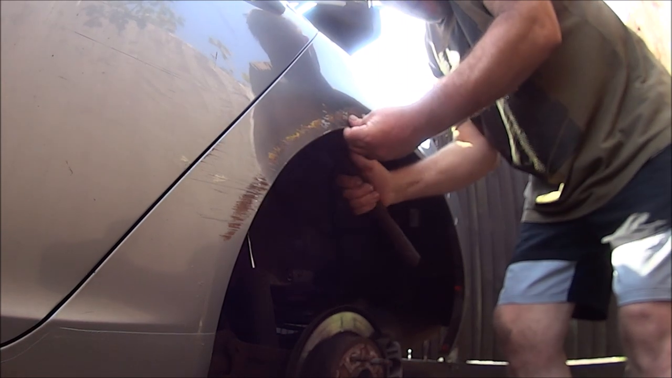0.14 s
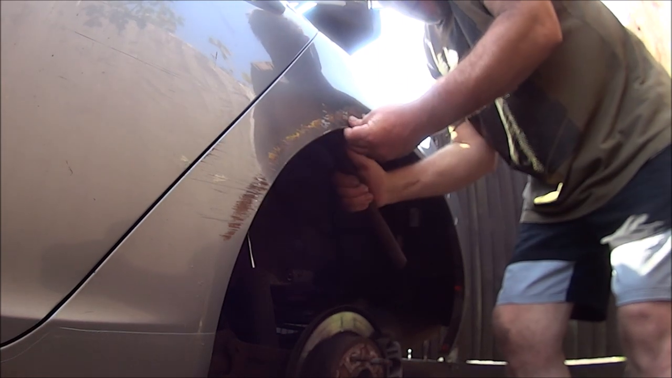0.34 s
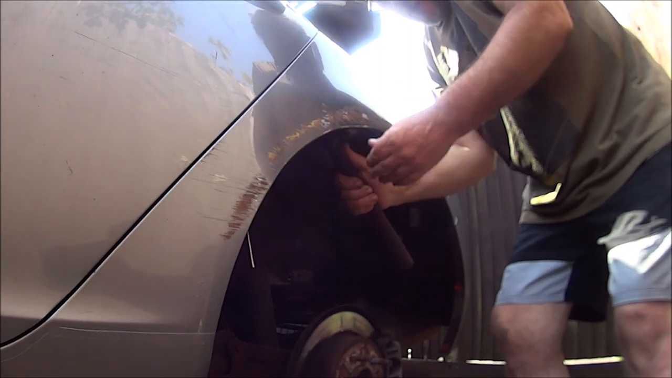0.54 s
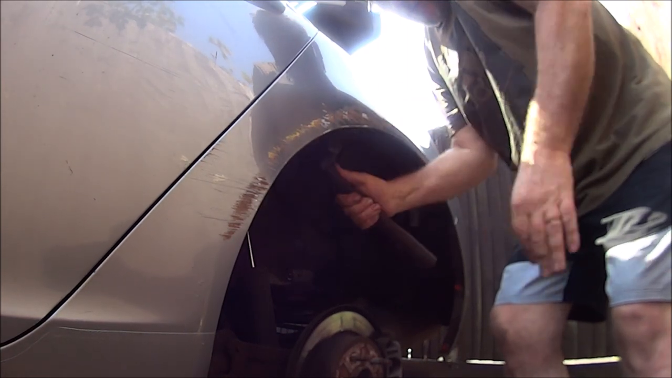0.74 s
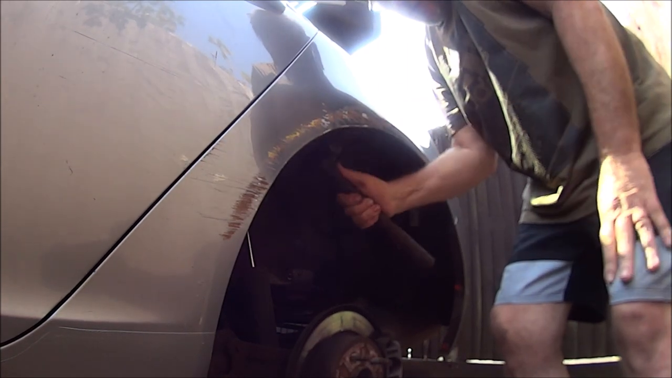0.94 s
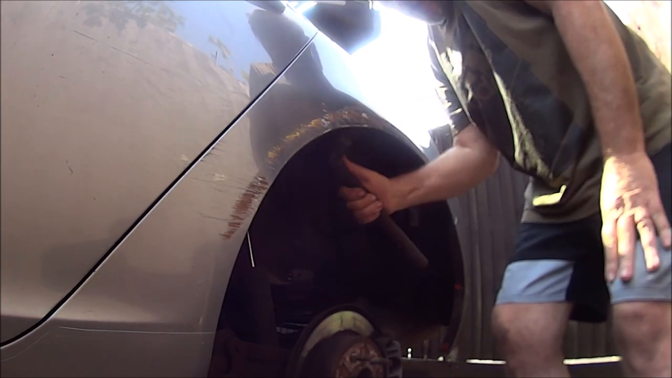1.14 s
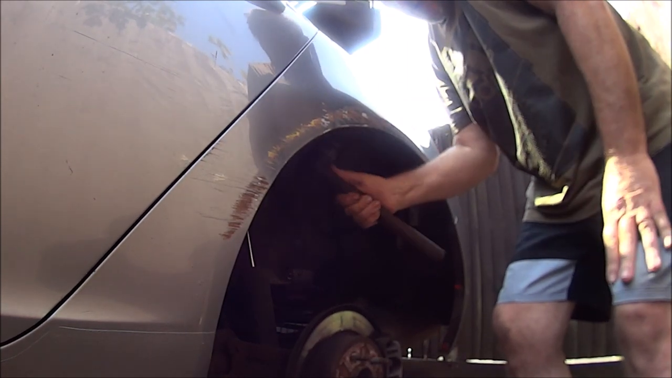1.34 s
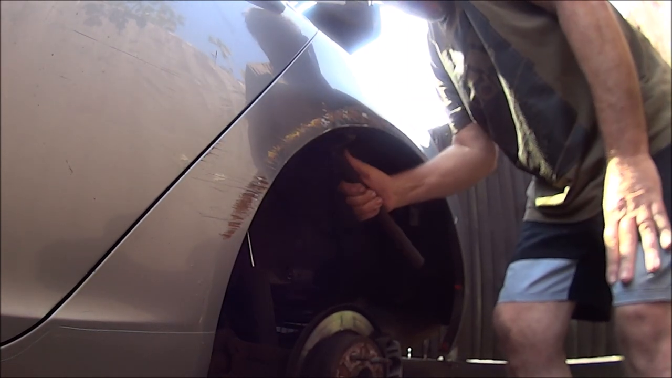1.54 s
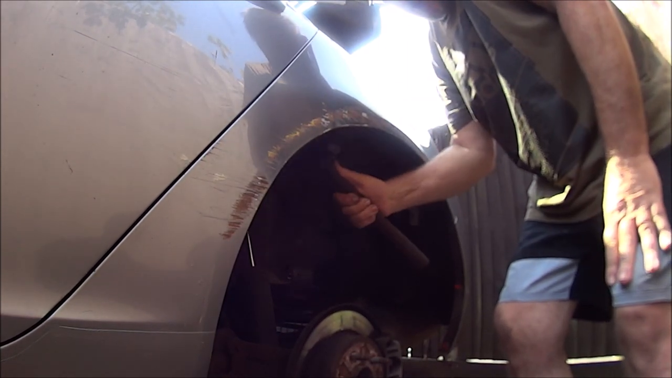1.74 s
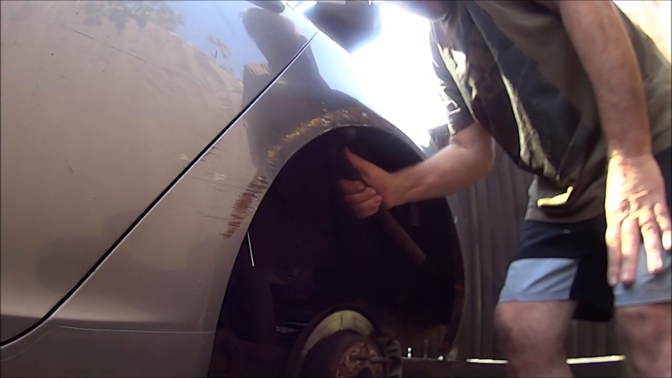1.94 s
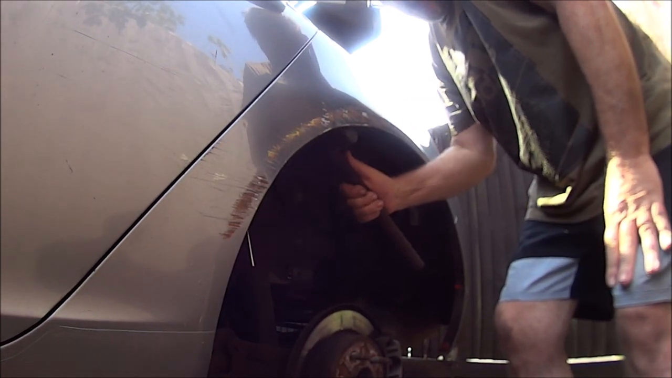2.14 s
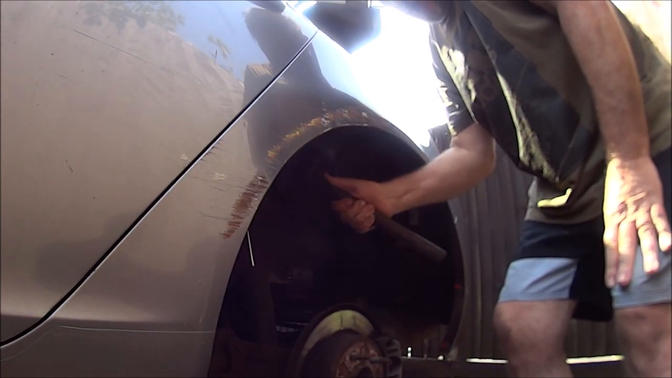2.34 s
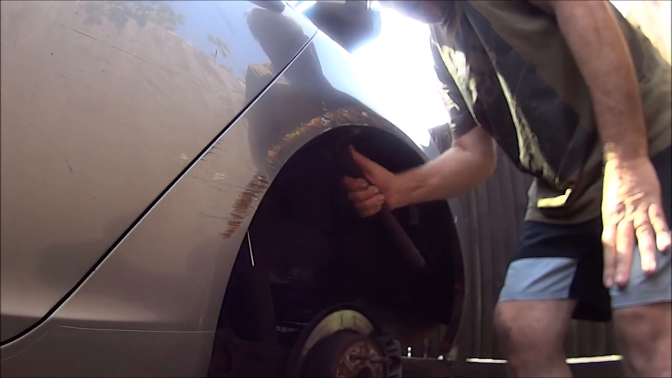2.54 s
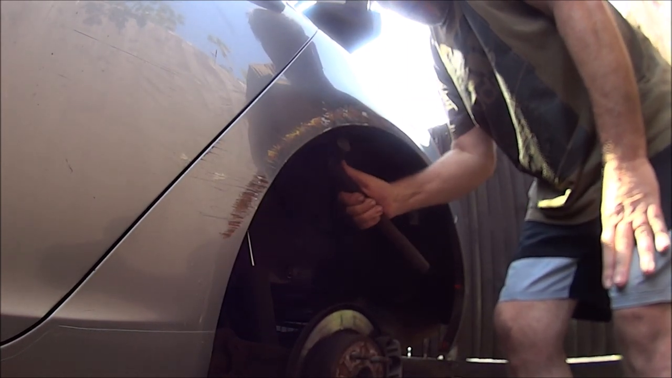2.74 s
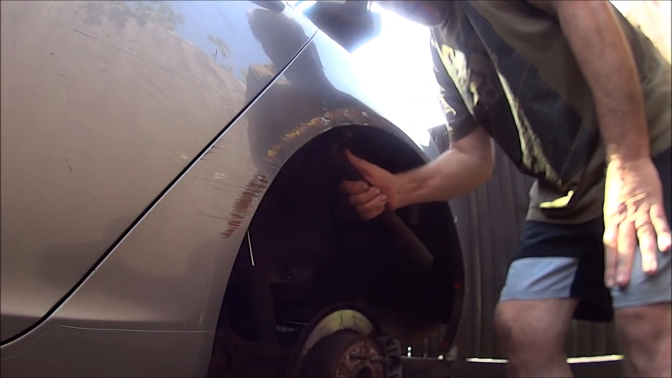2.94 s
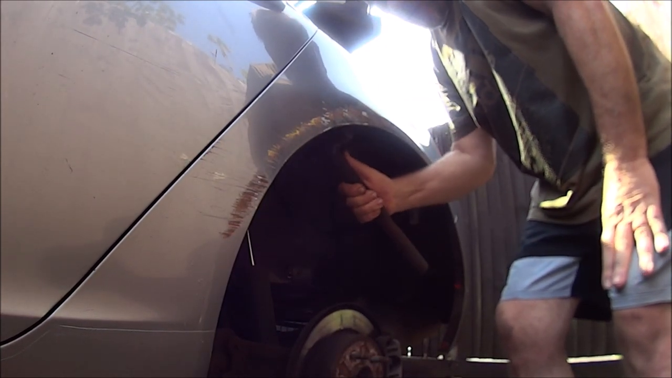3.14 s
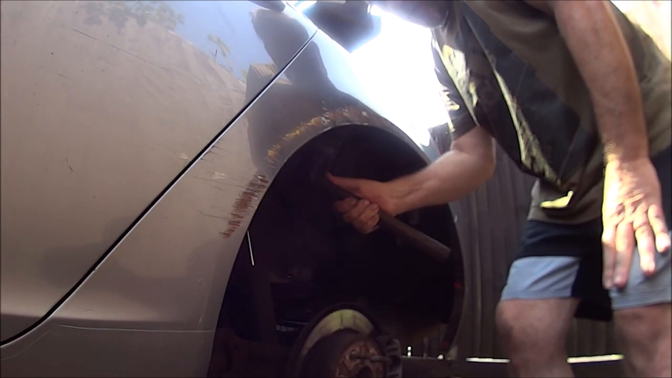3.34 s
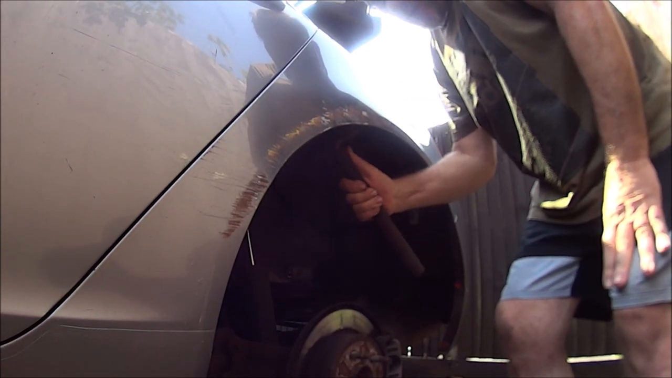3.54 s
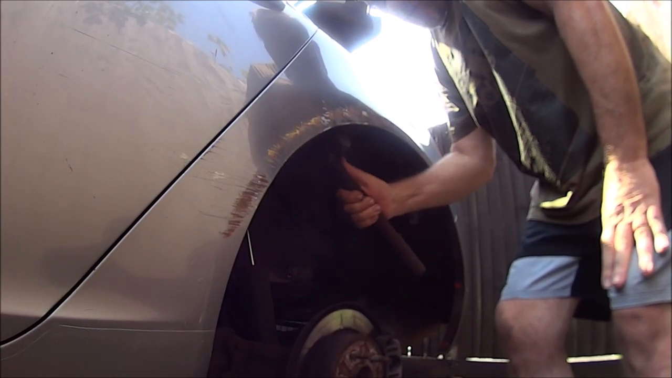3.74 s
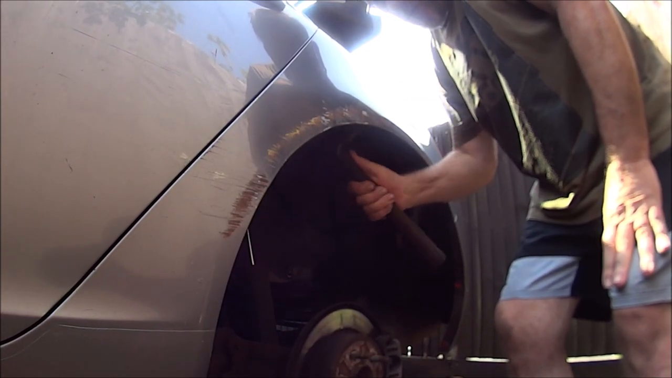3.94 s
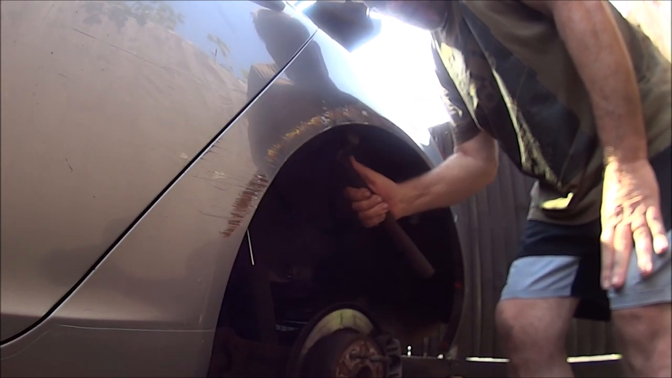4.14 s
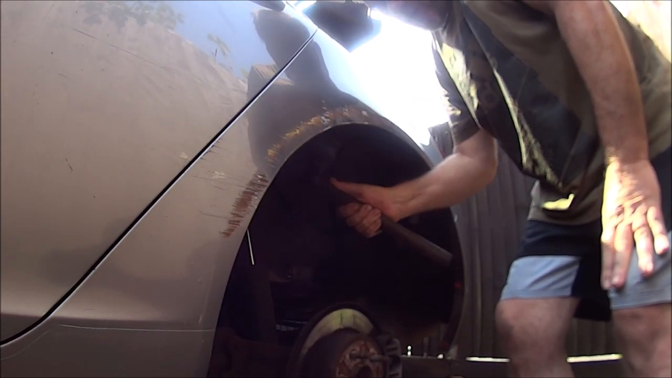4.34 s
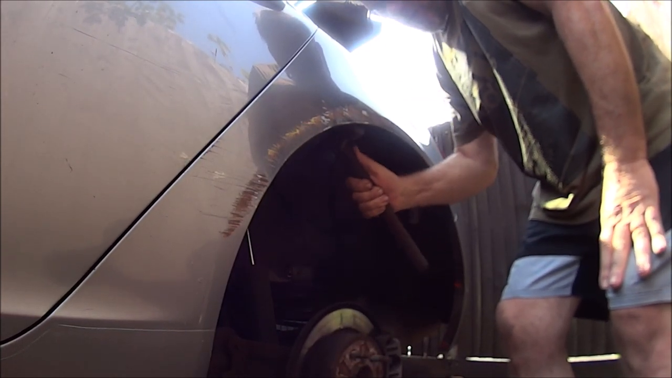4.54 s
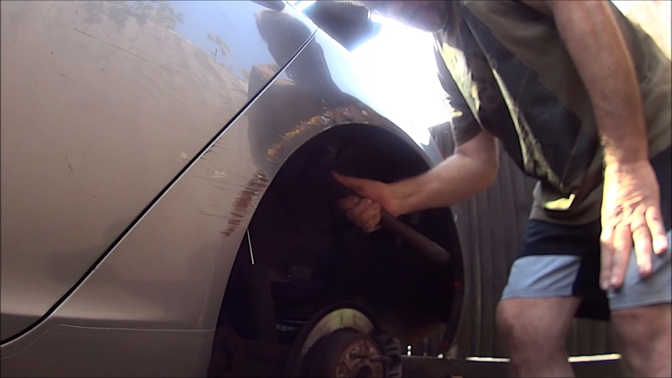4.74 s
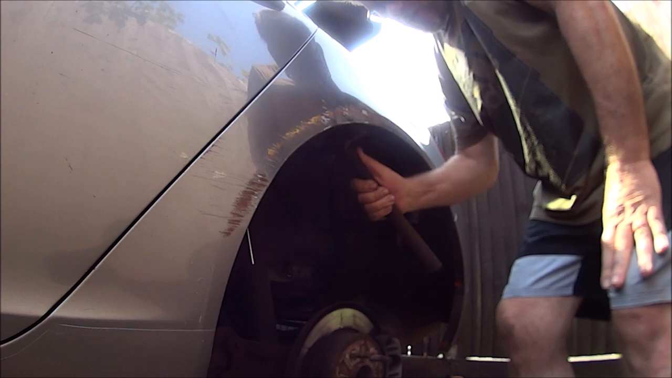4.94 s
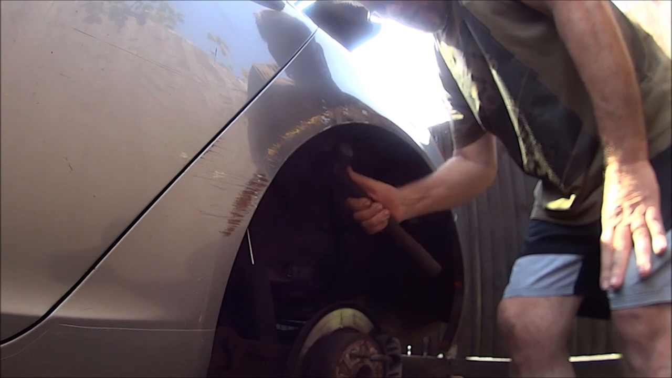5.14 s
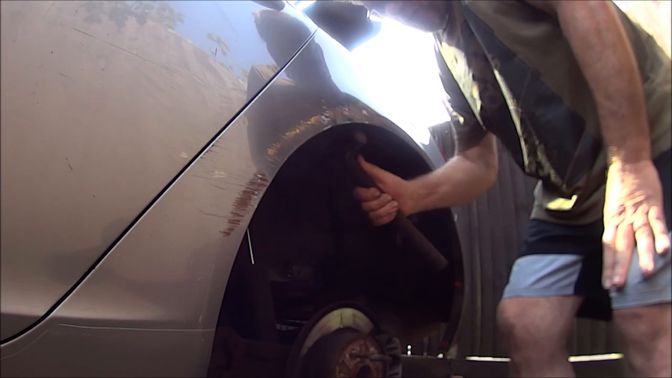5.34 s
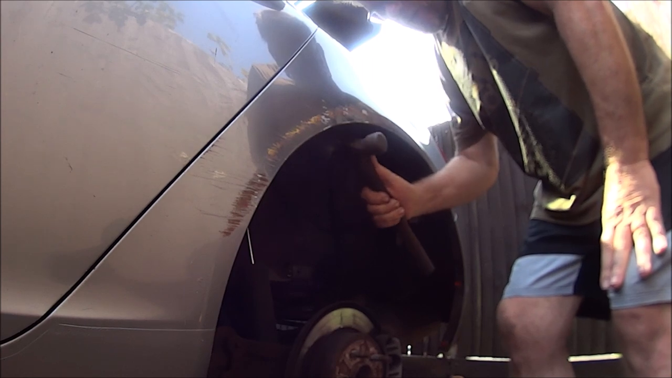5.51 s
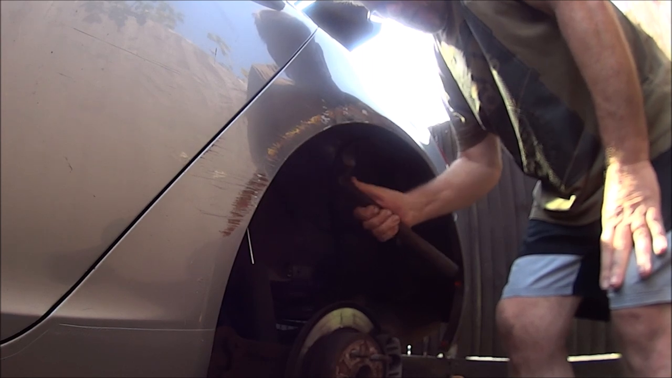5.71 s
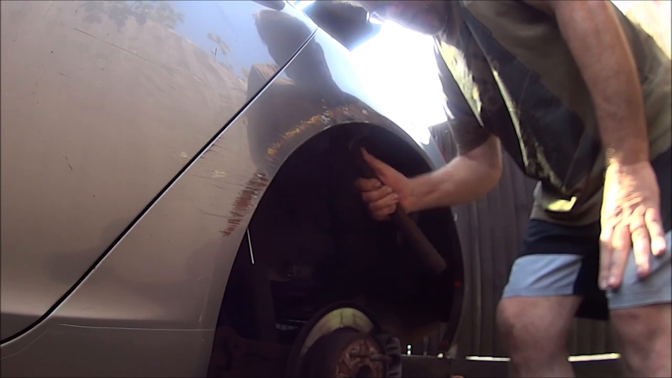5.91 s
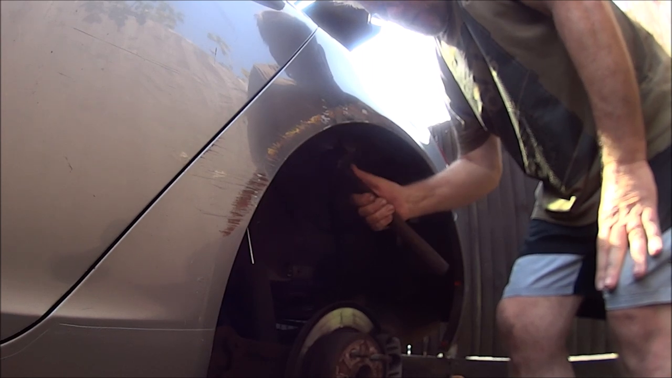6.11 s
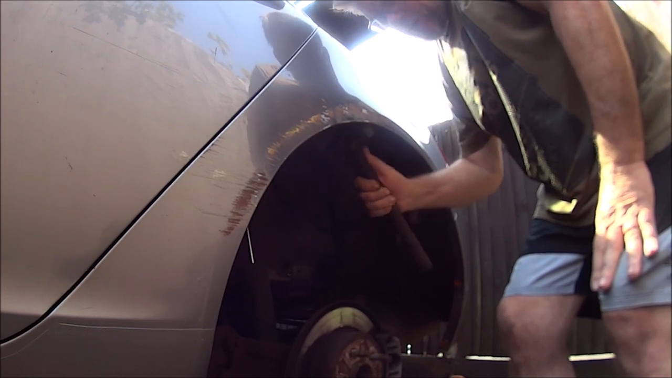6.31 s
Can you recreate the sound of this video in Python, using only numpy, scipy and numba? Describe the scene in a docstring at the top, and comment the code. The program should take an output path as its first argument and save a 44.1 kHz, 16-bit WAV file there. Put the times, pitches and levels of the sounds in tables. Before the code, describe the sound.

A hammer head scrapes and taps lightly on steel inside a car's wheel arch over faint hum and rumble. After about a second, hard regular blows begin, roughly two per second, each a sharp crack with a hollow thud, short metallic ring and rattling tail, many followed by a weaker bounce. Close, in a garage, on a small hissy camera microphone that squashes the hits. At the very end the hammering races, bright and high-pitched.

```python
"""In a garage, a hammer knocks a steel wheel arch from inside about twice a second, often bouncing once.
Each contact pushes the panel, which thuds, rings in modes and rattles in a noisy tail, under a noise-burst crack.
First the head shuffles (random slips through the panel) and knocks; hum partials and filtered rumble sink
as the blows start. A small camera microphone limits, clips and hisses.
For the last third of a second time runs four times fast, so two blows turn into bright double cracks."""
import sys
import numpy as np
from scipy import signal
from scipy.fft import rfft, irfft, next_fast_len
from scipy.io import wavfile
from scipy.ndimage import uniform_filter1d
from numba import njit

SR = 44100
rng = np.random.default_rng(int(sys.argv[2]) if len(sys.argv) > 2 else 0)


def int16_out(signal):
    """Quantize to a 16-bit WAV file."""
    q = np.round(np.clip(np.atleast_2d(signal).T, -1, 1) * 32767)
    wavfile.write(sys.argv[1], SR, q.astype(np.int16))


def field_ratio(decibels):
    """Amplitude ratio for a level in dB (20 dB per decade); scalars and array-likes work."""
    return 10 ** (np.asarray(decibels, dtype=float) / 20)


N = 285320

# microphone hiss spectrum: (frequency [Hz], relative density [dB])
HISS = [(20, -14), (40, 11), (70, -6), (120, -18), (1500, -2), (5000, -2), (11000, -9)]
# hiss heard in opposite phase left and right: (frequency [Hz], relative density [dB])
SIDE_HISS = [(18, -41), (30, -8), (422, -15.5), (527, -17), (842, -16), (11000, -18.5), (14300, -55),
             (22000, -120)]
# low garage rumble spectrum: (frequency [Hz], relative density [dB])
RUMBLE = [(60, -31), (100, -4), (300, 0), (600, 4), (900, -2), (1500, -5.5), (3000, -18), (6000, -36)]
# mains hum partials: (frequency [Hz], relative level [dB])
HUM = [(100.5, -51), (200, -54.5), (301.5, -52.5), (402, -55), (501, -72), (603, -79), (703, -58),
       (781, -61)]
# ringing modes of the arch, the longest belonging to the body shell:
# (frequency [Hz], relative level [dB], 60 dB decay time [s])
PANEL = [(108, -18, .33), (188, -12, .2), (300, -8, .15), (350, -5, .18), (522, -4, .16), (630, -2, .12),
         (715, 0, .13), (793, -12, .25), (845, -14, .4), (894, -10, .22), (968, -14, .25), (1092, -16, .2),
         (1185, -10, .16), (1290, -18, .18), (1420, -20, .2), (1577, -20, .2), (1715, -14, .12),
         (1812, -16, .18), (2100, -24, .13), (366, -56, 2.5), (490, -52, 2.0), (819, -44, 2.2),
         (841, -45, 1.8), (975, -51, 3.3)]
# dense upper modes and the garage, as a noisy tail: (frequency [Hz], relative density [dB])
TAIL = [(60, -38), (110, 2), (300, 1), (550, 2.5), (800, -1.5), (1270, -0.5), (1900, -8.5), (3000, -12),
        (5500, -10), (11000, -50)]
# how long that tail rings: (frequency [Hz], 60 dB decay time before ring scaling [s])
TAIL_T60 = [(80, 0.39), (210, 0.26), (560, 0.34), (1500, 0.2), (4000, 0.26), (10000, 0.042)]
# the hammer head drags and shuffles on the steel: (time [s], length [s], relative level [dB])
SCRAPES = [(0.0, 0.022, -35), (0.048, 0.69, -42.5), (0.145, 0.048, -27), (0.191, 0.054, -18),
           (0.321, 0.03, -47), (0.384, 0.017, -38), (0.467, 0.031, -23), (0.491, 0.053, -24.5),
           (0.609, 0.035, -22), (1.043, 0.12, -43)]
# the head is set against the arch: (heard time [s], strength [dB], crack against strength [dB])
KNOCKS = [(.184, -5.5, -21), (.228, -21, -41)]
# the head rebounds and lands again: (heard time [s], strength [dB], crack against strength [dB])
BOUNCES = [(1.749, -19.5, -44), (2.781, -13, -35), (3.252, -9, -8), (3.818, -18, -53), (4.244, -10, -26.5),
           (4.707, -8.5, -24), (5.192, -10, -50), (6.2651, -7.5, -8), (6.3907, -9, -13)]
# full swings: (heard time [s], strength [dB], crack against strength [dB])
BLOWS = [(1.221, -10, -2.5), (1.695, -7.5, -9), (2.172, -7, -16.5), (2.665, -7.5, -3.5), (3.151, -8.5, -2),
         (3.653, -8, -3), (4.143, -8.5, -2), (4.616, -6, -5), (5.100, -6, -4), (5.577, -6.5, -2.5),
         (6.074, -7.5, -10.5), (6.2433, -6.5, -3.5), (6.3668, -6.5, 5)]

# (ring length factor, time until the head settles on the steel [ms], starting thud [Hz], boom offset [dB])
BLOW_CONTACT, BOUNCE_CONTACT, KNOCK_CONTACT = (0.97, 83, 682, 0.11), (0.72, 42, 659, 0.058), (0.61, 48, 453, 5.4)
# the background sinks at the first blow, then creeps: (before [dB], after [dB], creep [dB/s])
HUM_DB, RUMBLE_DB, MIC_HISS_DB = (-50, -80, 2.5), (-46, -56.5, 0.36), (-50.5, -54, -0.01)
SINK_S = 0.029
SIDE_HISS_DB = -67.5
FAST_FROM_S, FADE_S, FAST = 6.158, 0.012, 4  # FAST is a speed factor
TOP_HZ, FAST_TOP_HZ = 11000, 15900  # top cuts as heard
LONG = N + FAST * SR // 2  # samples of garage time, enough for the fast stretch
SCRAPE_DECAY_DB, SCRAPE_DECAY_S = 9.5, 0.15  # low noise dying away from a scrape at the start
RUMBLE_WAVER_DB, HUM_WAVER_DB = 4, 1.6  # scale of the smoothed random level
MODES_DB, TAIL_DB, SETTLE_DB = -11, -2.5, -3
MODE_SCATTER_DB, MODE_DETUNE = 3, 0.00467  # random spread of each contact; detune is a share of the pitch
BOOM_UNDER_HZ, SHELL_SPLIT_HZ, SHELL_T60_S = 400, 900, 1  # rings longer than SHELL_T60_S are shell
CLATTER_DB, CLATTER_MS = 2, 4
SLIPS_PER_S, SLIP_SPREAD_DB = 1500, 2.2
SCRAPE_RISE, RASP_DB = 0.35, -1.5  # rise is a share of the length
PANEL_GAIN_DB, CRACK_GAIN_DB = 10.5, 3.5  # how well the panel and the bare steel radiate
# as the dent flattens the thud sinks and more panel booms
THUD_SAG_HZ_PER_S, BOOM_DB_PER_S, EVEN_BOOM_S = 18.7, 2, 4.5
# contacts weaker than FULL_THUD_DB barely dent the spot, so their thud shrinks
THUD_PER_DB, FULL_THUD_DB = 1.1, -10


def norm(x):
    """Scale to rms 1."""
    return x / np.sqrt(np.mean(x ** 2))


def colour(x, table):
    """Filter by (frequency [Hz], gain [dB]) points joined on a log axis."""
    size = next_fast_len(len(x))
    hz, db = np.transpose(table)
    f = np.maximum(np.arange(size // 2 + 1) * SR / size, 1)
    gain = field_ratio(np.interp(np.log(f), np.log(hz), db))
    return irfft(rfft(x, size) * gain, size)[:len(x)]


def band(x, lo_hz, hi_hz):
    """Causal band-pass."""
    return signal.sosfilt(signal.butter(2, [lo_hz, hi_hz], "bandpass", fs=SR, output="sos"), x)


def lowpass(x, hz):
    """Steep top cut without delay."""
    return signal.sosfiltfilt(signal.ellip(8, .1, 50, hz, fs=SR, output="sos"), x)


def walk(rate):
    """Random levels held for 1 / rate seconds and smoothed twice."""
    hold = int(SR / rate)
    steps = np.repeat(rng.standard_normal(LONG // hold + 1), hold)
    return uniform_filter1d(uniform_filter1d(steps, hold), hold)[:LONG]


def true_time(s):
    """Heard time to garage time."""
    return s + (FAST - 1) * max(s - FAST_FROM_S, 0)


def sinking_level(before, after, creep):
    """Background level in dB: steady, sinking at the first blow, then creeping."""
    since = np.maximum(np.arange(LONG) / SR - BLOWS[0][0], 0)
    return before + (after - before) * np.minimum(since / SINK_S, 1) + creep * since


def mic_hiss():
    """Microphone self-noise: coloured random noise."""
    return field_ratio(sinking_level(*MIC_HISS_DB)) * norm(colour(rng.standard_normal(LONG), HISS))


def side_hiss():
    """Quiet coloured noise for the difference between the two channels."""
    return field_ratio(SIDE_HISS_DB) * norm(lowpass(colour(rng.standard_normal(N), SIDE_HISS), TOP_HZ))


def rumble():
    """Low garage rumble: coloured noise with a wavering level, plus low noise dying away from a scrape at the
    start."""
    t = np.arange(LONG) / SR
    level_db = sinking_level(*RUMBLE_DB) + SCRAPE_DECAY_DB * np.exp(-t / SCRAPE_DECAY_S)
    noise = norm(colour(rng.standard_normal(LONG), RUMBLE))
    return field_ratio(level_db + RUMBLE_WAVER_DB * walk(5.8)) * noise


def mains_hum():
    """Mains hum: steady sine partials, each wavering in level on its own."""
    t = np.arange(LONG) / SR
    hum = np.zeros(LONG)
    for k, (hz, db) in enumerate(HUM):
        hum += field_ratio(db + HUM_WAVER_DB * walk(18.0)) * np.sin(2 * np.pi * hz * t + k)
    return field_ratio(sinking_level(*HUM_DB)) * hum / field_ratio(HUM[0][1])  # levelled by the first partial


def panel_modes(ring, bass_db):
    """Decaying sine modes with new weights at each contact: the panel's sum, then the body shell's."""
    t = np.arange(SR) / SR
    hz, db, t60 = (column[:, None] for column in np.transpose(PANEL))
    chance = rng.standard_normal((len(PANEL), 2))
    hz = hz * (1 + MODE_DETUNE * chance[:, :1])
    # more boom also weakens the shell's highest long ring
    boom = np.where(t60 > SHELL_T60_S, -1. * (hz > SHELL_SPLIT_HZ), hz < BOOM_UNDER_HZ)
    level_db = MODES_DB + db + bass_db * boom + MODE_SCATTER_DB * chance[:, 1:]
    modes = field_ratio(level_db - 60 * t / (t60 * ring)) * np.sin(2 * np.pi * hz * t)
    shell = t60[:, 0] > SHELL_T60_S
    return modes[~shell].sum(axis=0), modes[shell].sum(axis=0)


def panel_tail(ring, bright_db, bass_db):
    """Dense upper modes and the garage as bands of noise, each with its own decay."""
    t = np.arange(SR // 2) / SR
    centres = 80 * 2 ** np.arange(0, 7.5, .75)
    gains, decays = (np.interp(np.log(centres), np.log(np.array(table)[:, 0]), np.array(table)[:, 1])
                     for table in (TAIL, TAIL_T60))
    # sharper contacts shake up more treble rattle
    gains = gains + bright_db * np.clip(np.log2(centres / 1000.0) / 2, 0, 1)
    gains = gains + bass_db * (centres < BOOM_UNDER_HZ)
    tail = np.zeros(len(t))
    for hz, db, t60 in zip(centres, gains, decays):
        noise = band(rng.standard_normal(len(t)), hz / 1.3, hz * 1.3)
        tail += noise * field_ratio(db - 60 * t / (t60 * ring))
    # loose seams make the tail clatter in short knots
    knot = int(CLATTER_MS * SR / 1000)
    knots = np.repeat(rng.standard_normal(len(t) // knot + 1), knot)
    tail = tail * field_ratio(CLATTER_DB * uniform_filter1d(knots, knot // 2)[:len(t)])
    return field_ratio(TAIL_DB) * tail * (1 - np.exp(-t / 0.00033))


def dent_thud(thud_hz, thud_db):
    """The struck spot: a couple of cycles of a low, heavily damped thud and its overtone."""
    t = np.arange(SR) / SR
    thud = field_ratio(3.5 + thud_db) * np.sin(2 * np.pi * thud_hz * t) * np.exp(-(t / 0.0021) ** 2)
    overtone = np.sin(2 * np.pi * 2.735 * thud_hz * t) * np.exp(-t / 0.0069)
    return thud + field_ratio(-14 + thud_db) * overtone


def panel(ring, thud_hz, settle_ms, bright_db, bass_db, thud_db):
    """One panel response: thud, modes and tail, damped as the head settles on the steel."""
    t = np.arange(SR) / SR
    modes, shell = panel_modes(ring, bass_db)
    # the bending waves take a moment to spread
    near = dent_thud(thud_hz, thud_db) + modes * (1 - np.exp(-t / 0.0026))
    near[:SR // 2] += panel_tail(ring, bright_db, bass_db)
    settled = np.clip((t - settle_ms / 1000) / 0.011, 0, 1)
    return near * field_ratio(SETTLE_DB * settled) + shell  # the shell is out of the hammer's reach


def scrapes():
    """Uneven slips that swell and fade, ringing the hand-damped panel and a raspy lip."""
    swell = np.zeros(LONG)
    for s, length, db in SCRAPES:
        u = np.linspace(0, 1, int(length * SR))
        i = int(s * SR)
        swell[i:i + len(u)] += field_ratio(db) * np.minimum(u / SCRAPE_RISE, 1) * np.sqrt(1 - u)
    sizes = field_ratio(SLIP_SPREAD_DB * rng.exponential(size=LONG)) * np.sign(rng.standard_normal(LONG))
    slips = swell * norm((rng.random(LONG) < SLIPS_PER_S / SR) * sizes)
    body = panel(0.61, 900, 25, 1.7, 2.6, -1.8)[:SR // 5]
    body = body / np.sqrt(np.sum(body ** 2))
    rasp = 4.0 * (band(slips, 1320, 1520) + .6 * band(slips, 1650, 1900))
    return band(signal.fftconvolve(slips, body)[:LONG], 150, 2580) + field_ratio(RASP_DB) * rasp


def crack():
    """Steel on steel: a very short burst of band-passed noise."""
    t = np.arange(2000) / SR
    noise = band(rng.standard_normal(len(t)), 1530, 5620)
    return noise * (1 - np.exp(-t / 0.00042)) * np.exp(-t / 0.0017)


def contact(s, db, crack_db, ring, settle_ms, thud_hz, boom_db):
    """One contact: a short push into the panel plus a crack."""
    t = np.arange(256) / SR
    push = t * np.exp(-t / (.00006 * field_ratio(-.6 * db)))  # weaker contacts press longer, so they sound duller
    bass_db = boom_db + BOOM_DB_PER_S * (true_time(s) - EVEN_BOOM_S)
    thud_db = THUD_PER_DB * min(db - FULL_THUD_DB, 0)
    bright_db = 0.46 * crack_db + 5.0
    ringing = panel(ring, thud_hz - THUD_SAG_HZ_PER_S * s, settle_ms, bright_db, bass_db, thud_db)
    sound = signal.fftconvolve(ringing, push / push.sum())[:SR]
    snap = crack()
    sound[:len(snap)] += field_ratio(crack_db + CRACK_GAIN_DB) * snap
    return field_ratio(db + PANEL_GAIN_DB) * sound


def hammer():
    """Knocks, blows and bounces, each striking the panel anew and laid out in garage time."""
    out = np.zeros(LONG + 2 * SR)
    kinds = ((BLOWS, BLOW_CONTACT), (BOUNCES, BOUNCE_CONTACT), (KNOCKS, KNOCK_CONTACT))
    for table, settings in kinds:
        for s, db, crack_db in table:
            i = int(true_time(s) * SR)
            out[i:i + SR] += contact(s, db, crack_db, *settings)
    return out[:LONG]


@njit
def follow(x, attack, release):
    """Peak follower, quick up and slow down."""
    e, out = 0., np.empty(len(x))
    for i in range(len(x)):
        e += (abs(x[i]) - e) * (attack if abs(x[i]) > e else release)
        out[i] = e
    return out


def camera(x, hiss):
    """Bass cut, hiss, a limiter that squeezes each blow and lets go over its tail, clipping, a coupling capacitor."""
    x = signal.sosfilt(signal.ellip(5, .5, 40, 96, "highpass", fs=SR, output="sos"), x) + hiss
    level = follow(x, 1 / (0.0093 * SR), 1 / (0.054 * SR))
    limited = x * (1 + (level / .12) ** 2) ** -.3
    clipped = np.clip(limited, -.5, .5)
    return signal.sosfilt(signal.butter(2, 62, "highpass", fs=SR, output="sos"), clipped)


def scene():
    """Play the garage at normal speed, then cross over to four times fast."""
    mid = camera(mains_hum() + rumble() + scrapes() + hammer(), mic_hiss())
    start = int(FAST_FROM_S * SR)
    fast = np.zeros(N)
    # keeping every fourth sample speeds time up and raises the pitch
    fast[start:] = lowpass(mid, FAST_TOP_HZ / FAST)[start::FAST][:N - start]
    fade = np.clip((np.arange(N) / SR - FAST_FROM_S) / FADE_S, 0, 1)
    mid = lowpass(mid, TOP_HZ)[:N] * (1 - fade) + fast * fade
    side = side_hiss() * (1 - fade)
    return np.array([mid + side, mid - side])


def low_pass(x):
    """Removes everything above the highest recorded frequency."""
    return signal.sosfilt(signal.butter(12, 17140, fs=SR, output="sos"), x)


def record(dry):
    """Turn the finished mix into the sound that is written out."""
    return low_pass(dry)


dry = scene()
out = record(dry)
int16_out(out)
```